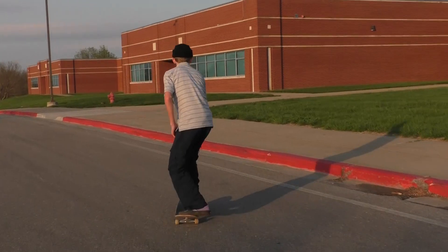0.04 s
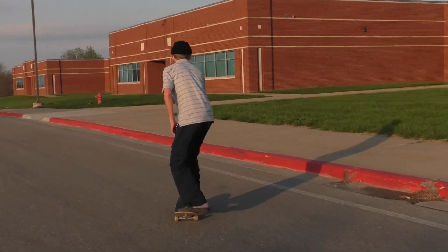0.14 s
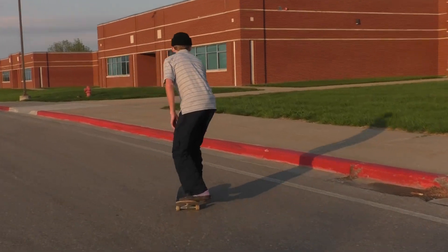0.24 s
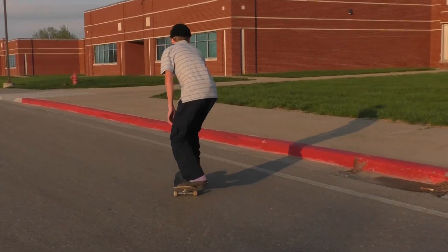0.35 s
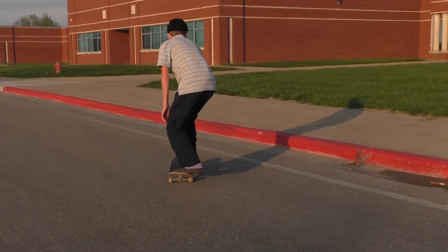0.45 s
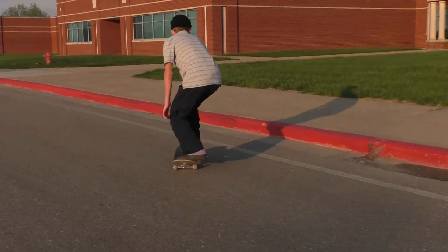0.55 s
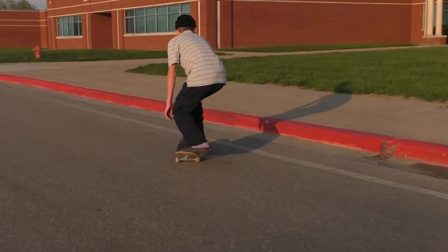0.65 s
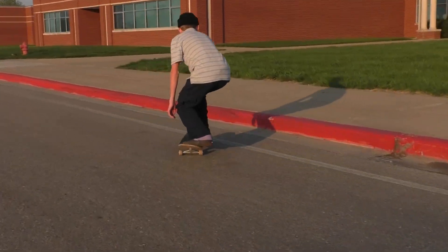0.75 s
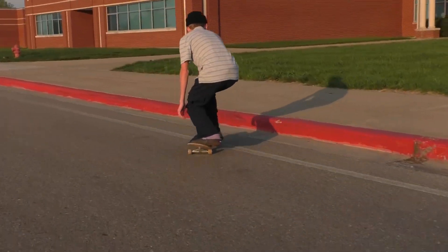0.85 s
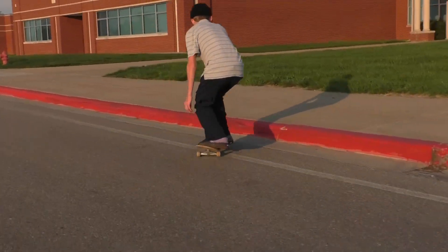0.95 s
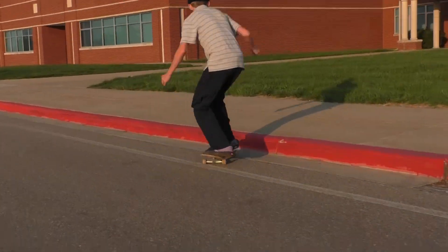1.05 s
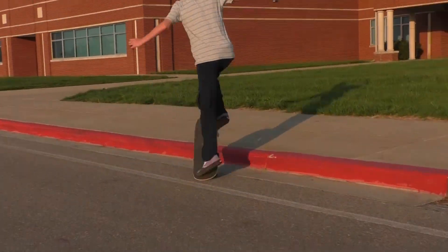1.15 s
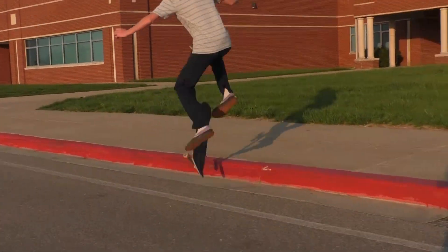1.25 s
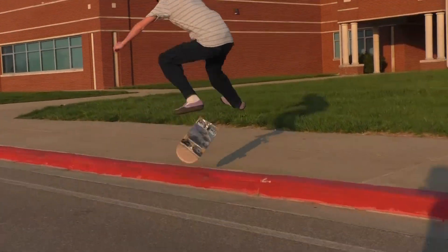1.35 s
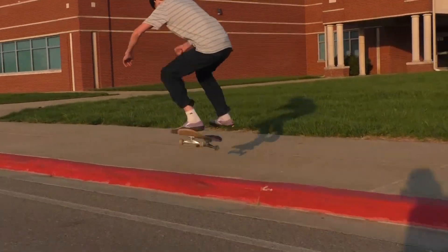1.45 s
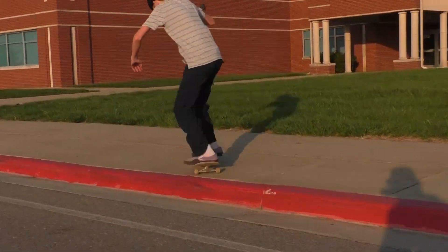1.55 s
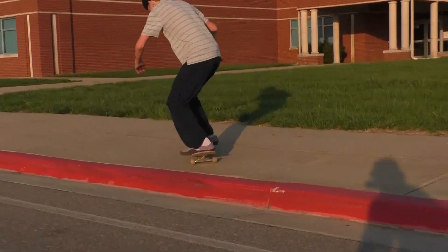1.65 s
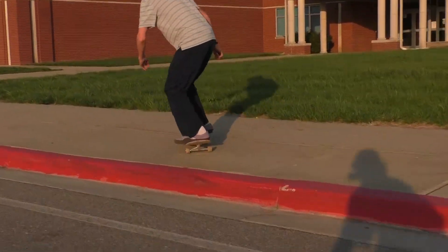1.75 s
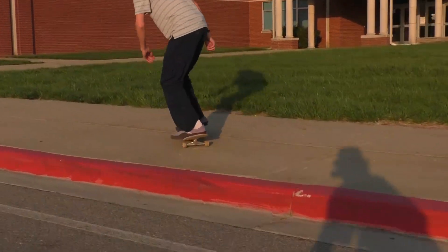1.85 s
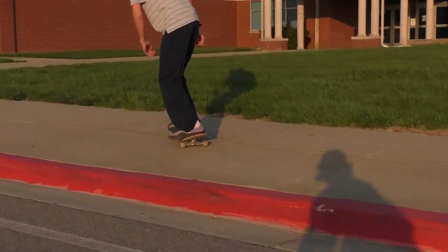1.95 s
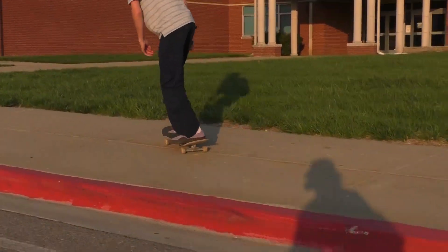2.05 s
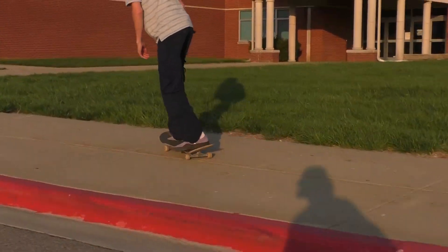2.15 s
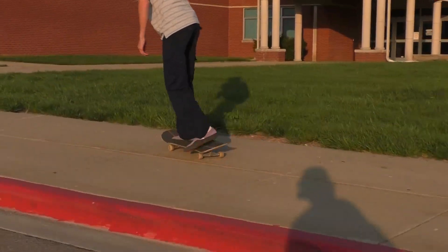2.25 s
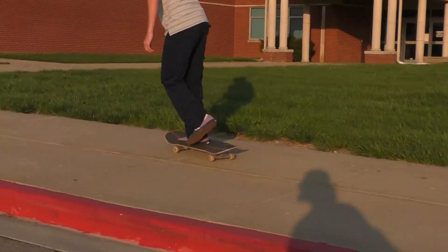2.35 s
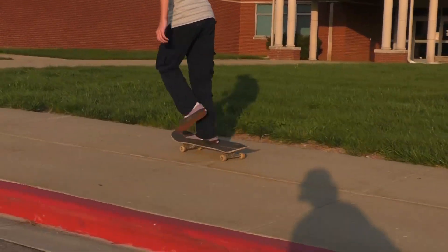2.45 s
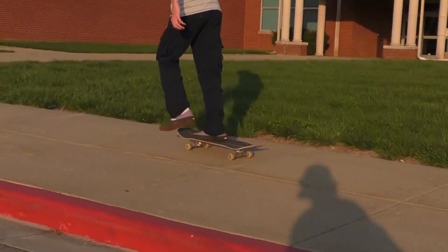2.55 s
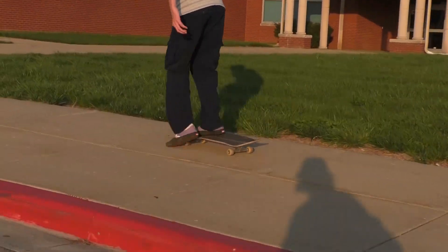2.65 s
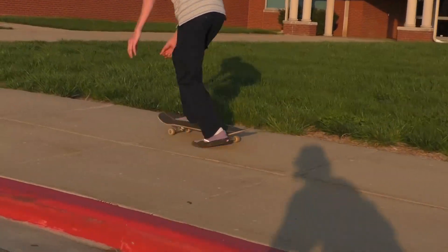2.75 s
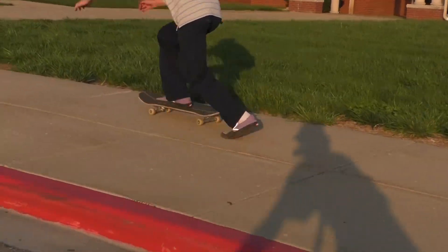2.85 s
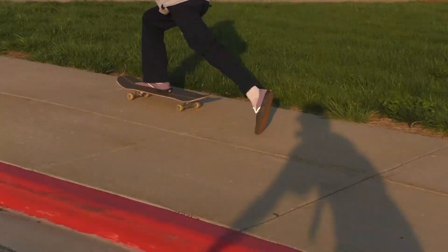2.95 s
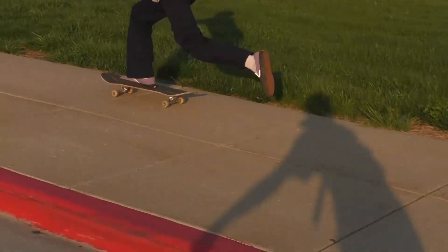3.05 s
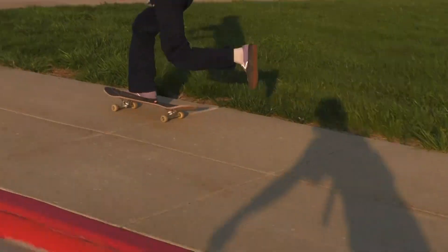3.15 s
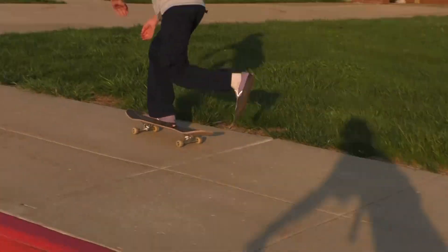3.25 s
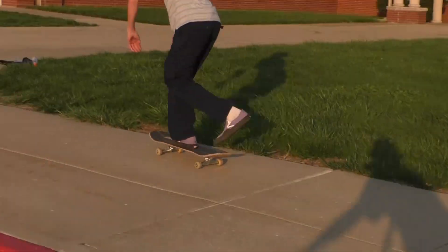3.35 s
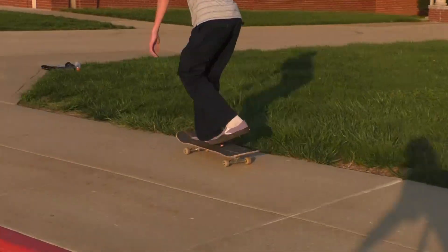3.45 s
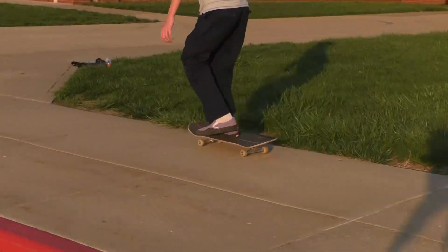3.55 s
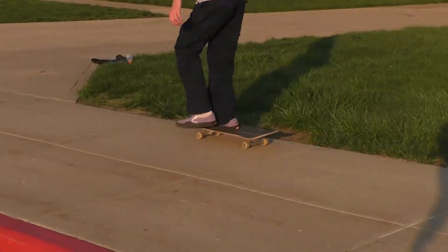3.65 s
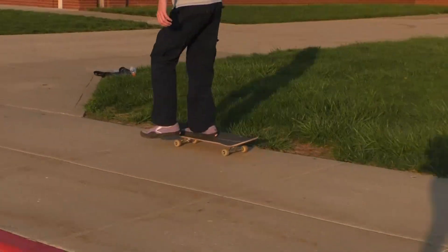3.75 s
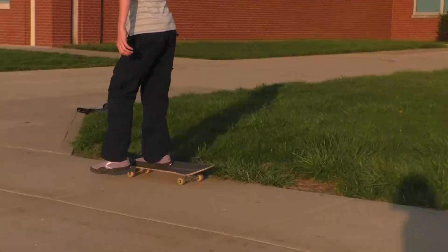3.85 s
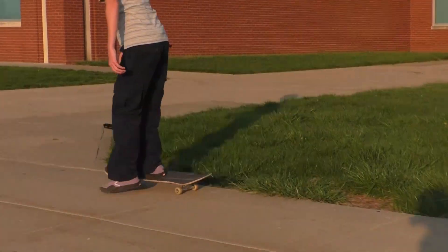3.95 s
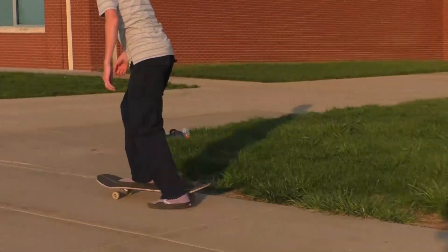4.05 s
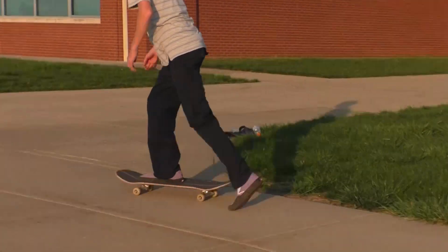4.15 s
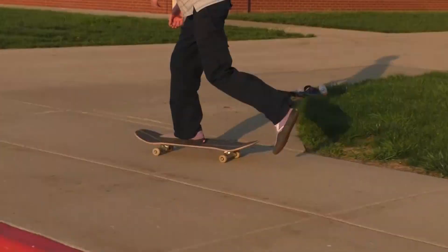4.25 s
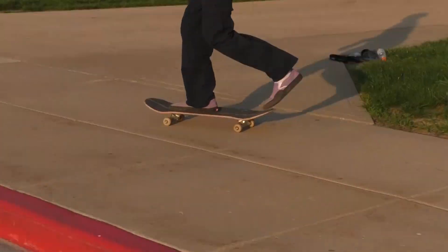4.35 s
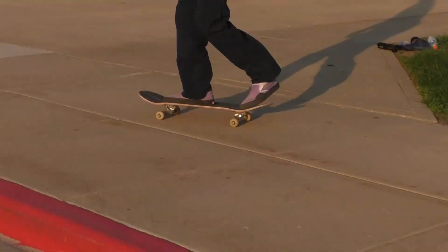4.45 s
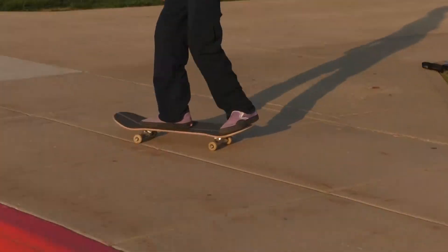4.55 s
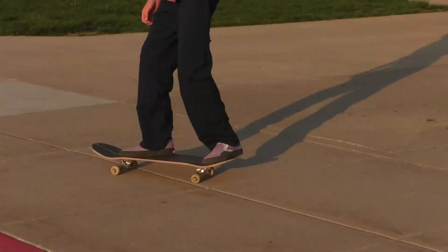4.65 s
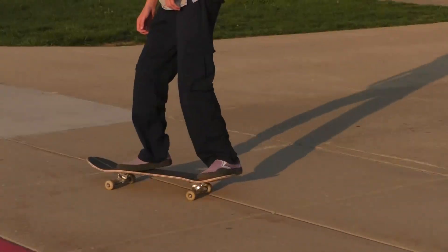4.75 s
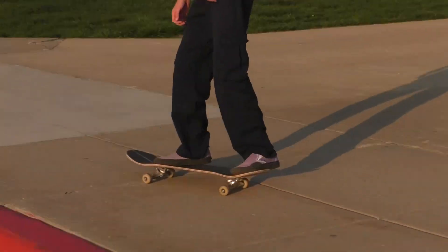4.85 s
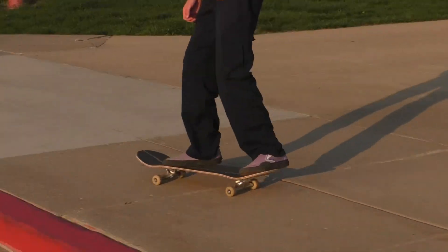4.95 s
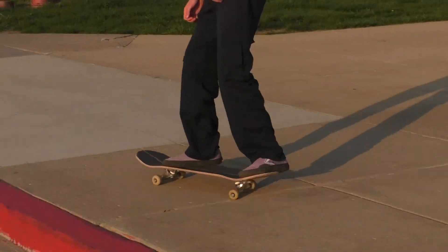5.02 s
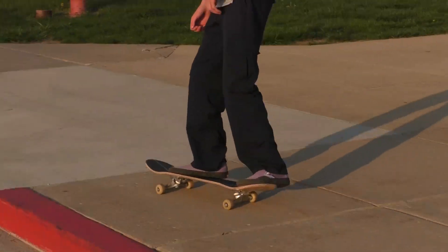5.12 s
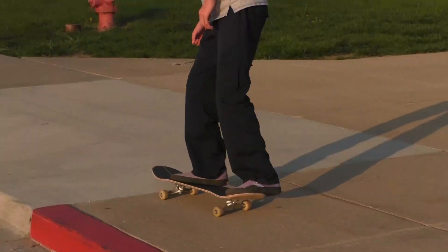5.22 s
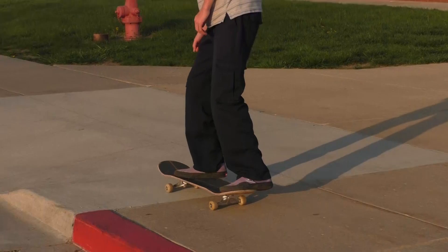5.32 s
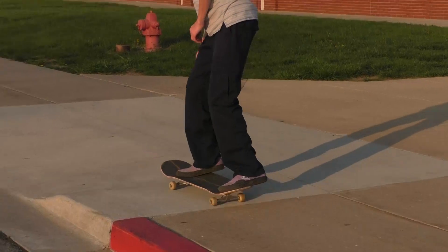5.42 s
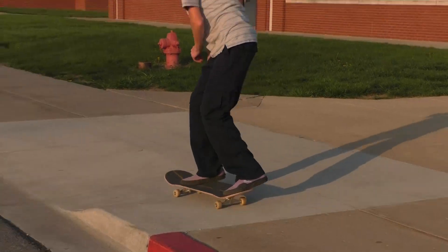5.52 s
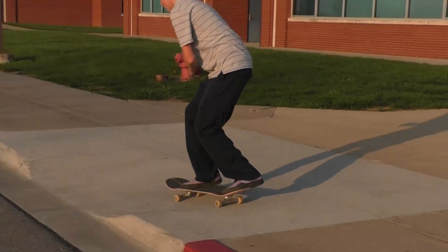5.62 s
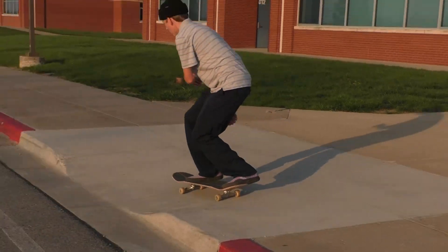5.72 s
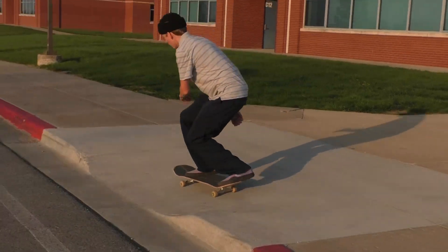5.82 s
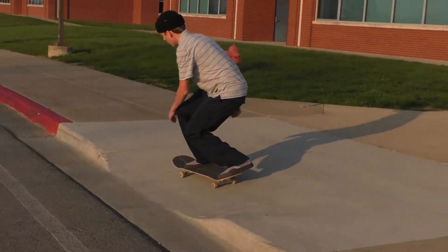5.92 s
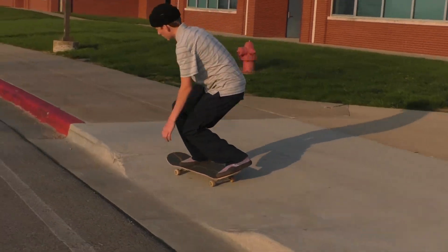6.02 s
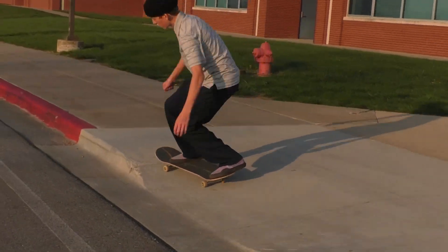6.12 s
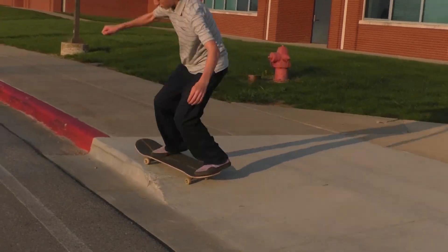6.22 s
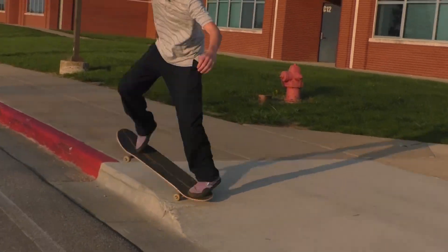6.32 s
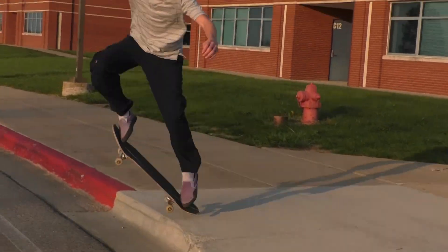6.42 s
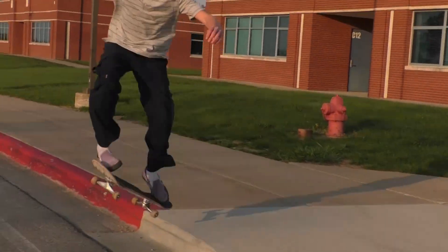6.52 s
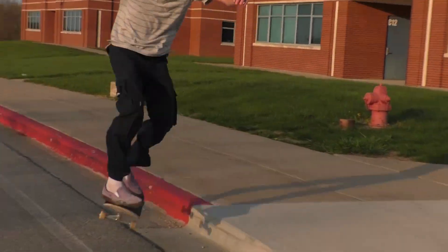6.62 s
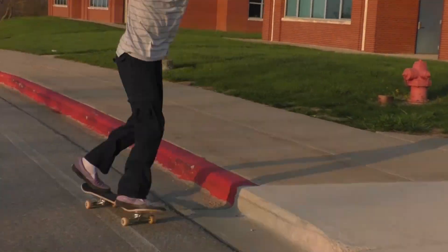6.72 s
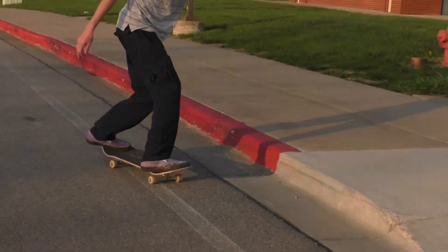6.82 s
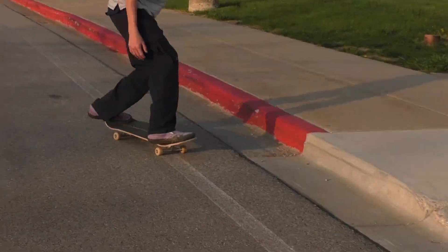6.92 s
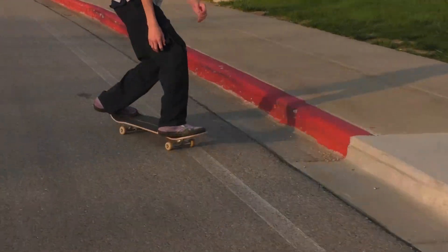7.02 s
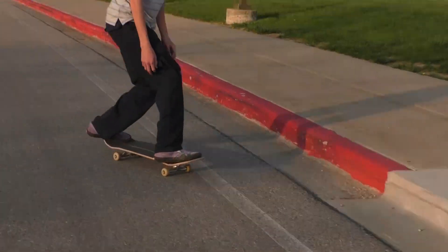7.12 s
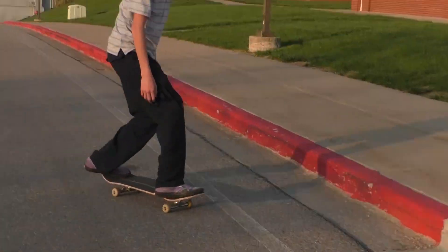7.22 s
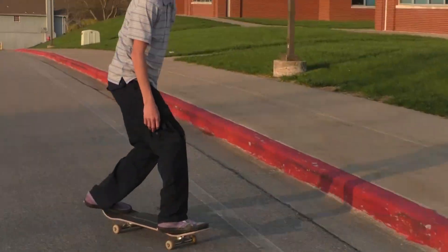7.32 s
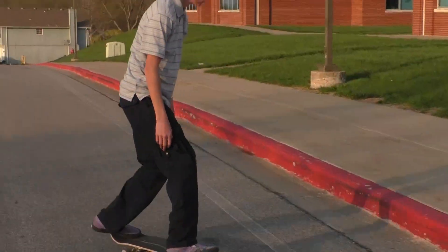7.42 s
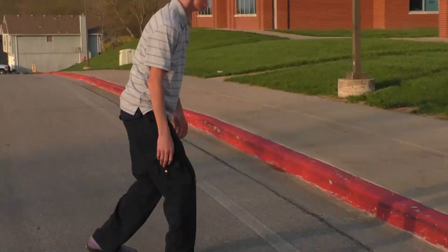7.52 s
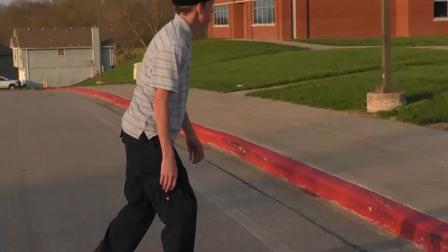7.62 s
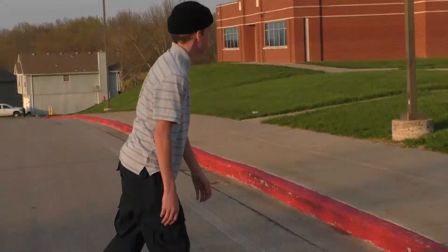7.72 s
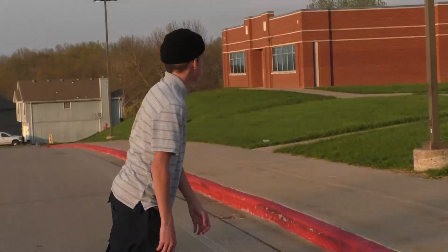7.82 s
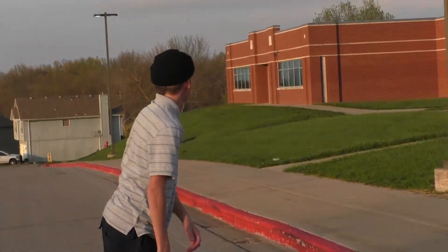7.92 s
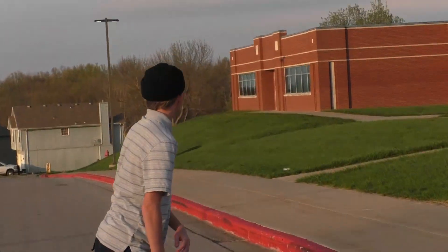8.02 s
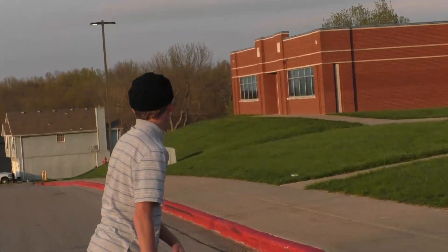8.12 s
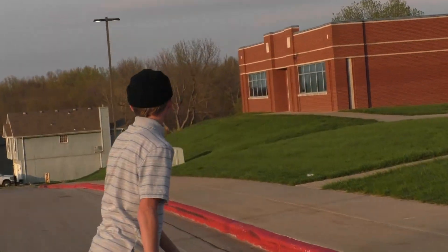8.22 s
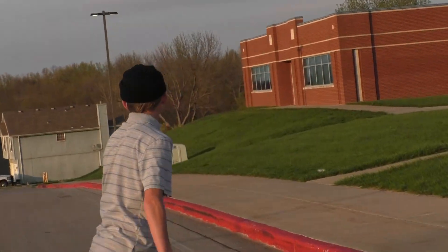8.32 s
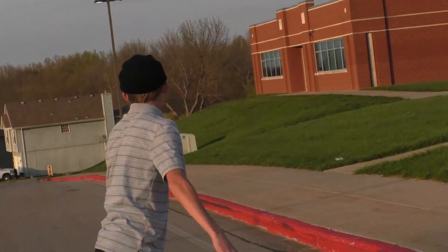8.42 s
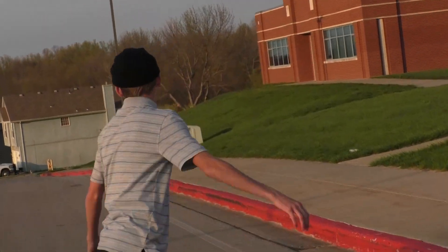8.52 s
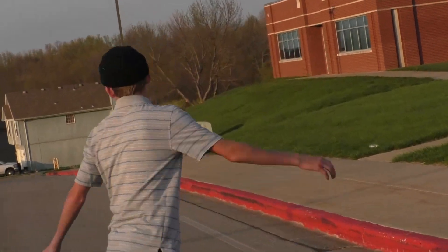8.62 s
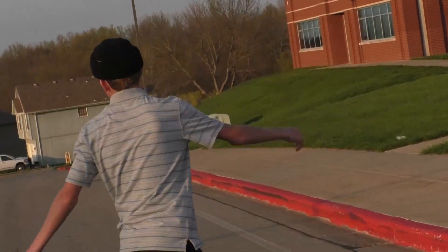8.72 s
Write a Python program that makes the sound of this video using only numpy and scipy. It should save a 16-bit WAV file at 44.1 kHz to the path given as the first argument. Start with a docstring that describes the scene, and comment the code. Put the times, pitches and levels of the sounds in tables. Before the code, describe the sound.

A steady woody drumming of wheels on coarse asphalt, with crackling grit, loose hardware rattle and faint bearing hiss, heard from a camera riding just above the board. Sharp clacks mark a jump onto the kerb, slab joints and a drop back to the road. Low air buffeting and a faint drone sit beneath, with a very short, dry outdoor reflection.

```python
"""Skateboards roll over asphalt and concrete paving, one of them right under a moving camera.
The road's grain drums through the wheels into the deck; grit crackles, hardware rattles, bearings hiss,
and a drone and moving air lie underneath. Jolts, snapping pebbles and wheel clacks over joints break in,
a board pops up a kerb, soles and wheels scrape sideways, and a board later lands back on the road.
The camera's limiter ducks the rolling after the hardest blows."""
import sys
import numpy as np
from scipy import signal
from scipy.fft import rfft, irfft, next_fast_len
from scipy.io import wavfile
from scipy.ndimage import uniform_filter1d, map_coordinates

SR = 44100
rng = np.random.default_rng(int(sys.argv[2]) if len(sys.argv) > 2 else 0)


def master_out(mix):
    """Clip the mix to full scale and print it as 16-bit PCM to the path in sys.argv[1]."""
    frames = np.transpose(np.atleast_2d(mix))
    ceiling = np.clip(frames, -1, 1)
    pcm = np.round(ceiling * 32767).astype(np.int16)
    wavfile.write(sys.argv[1], SR, pcm)


N = 386757

# the ride as the ground changes; the sources trim these levels further:
# [time_s, deck_rumble_db, wheel_growl_db, bearing_hiss_db]
GROUND_RIDE = [(0.0, -22.5, -35, -57.5), (1.15, -21, -33.5, -55.5), (1.4, -22, -35.5, -61),
               (1.75, -20, -33, -57), (2.1, -20, -30.5, -52.5), (2.65, -22.5, -33, -55.5),
               (3.05, -22, -33, -51), (3.22, -26.5, -34.5, -51.5), (3.4, -22.5, -32.5, -55),
               (3.6, -26.5, -36.5, -57.5), (3.75, -23, -35, -54), (3.92, -21, -31, -57.5),
               (4.25, -25, -37, -57), (4.75, -21, -31.5, -56), (5.3, -23.5, -32.5, -54.5),
               (5.75, -21.5, -36, -54), (6.3, -20, -33, -51), (6.65, -21.5, -32.5, -59.5),
               (7.1, -20, -34.5, -55), (7.85, -25, -36, -53.5), (8.2, -25, -37.5, -59),
               (8.77, -24, -28.5, -58)]
# the ringing of wood and truck: [pitch_hz, relative_level_db, t60_s]
BOARD_MODES = [(990, 7, 0.033), (1233, 5, 0.027), (1573, 4, 0.027), (1813, 3, 0.018), (2110, 0.5, 0.027),
               (2424, -6.5, 0.035), (2905, -0.5, 0.023), (3266, -5, 0.033), (3660, -6, 0.041),
               (4080, -8, 0.053), (4840, -6.5, 0.033)]
# colour of a dry crack: [pitch_hz, relative_level_db]
CRACK_COLOUR = [(400, -8), (1200, 12.5), (2000, 5.5), (3900, -0.5), (5800, -7), (12000, -61)]
# colour of clicking metal: [pitch_hz, relative_level_db]
METAL_COLOUR = [(3000, -38), (5500, -5.5), (7000, 0.5), (8800, 10.5), (10800, 8.5), (13000, -2),
                (16000, -1)]


def amp(db):
    """Decibels to gain."""
    return np.exp(np.asarray(db) * np.log(10) / 20)


def unit(x):
    """Scale to rms 1."""
    return x / np.sqrt(np.mean(x ** 2) + 1e-20)


def along(points, hz):
    """Interpolate (Hz, value) points on a log frequency axis."""
    f, v = np.transpose(points)
    return np.interp(np.log(hz + 1), np.log(f + 1), v)


def curves(rows):
    """One value per sample for each column after the time."""
    s, *cols = np.transpose(rows)
    return [np.interp(np.arange(N) / SR, s, c) for c in cols]


def during(span, fade_s):
    """1 inside the span and 0 outside, with soft edges."""
    t = np.arange(N) / SR
    return np.clip(np.minimum(t - span[0], span[1] - t) / fade_s + .5, 0, 1)


def wobble(rate):
    """A smooth random curve, rate knots a second."""
    knots = rng.standard_normal(int(N * rate / SR) + 4)
    return map_coordinates(knots, [np.arange(N) * rate / SR])


def filtered(x, response):
    """Filter x by a response given as a function of frequency."""
    m = next_fast_len(N + 8192)
    return irfft(rfft(x, m) * response(np.fft.rfftfreq(m, 1 / SR)), m)[..., :N]


def body(x, spectrum):
    """Ring x through a causal, minimum-phase body with this spectrum; the result has rms 1."""
    size = 4096
    cepstrum = irfft(np.log(amp(along(spectrum, np.fft.rfftfreq(size, 1 / SR)))))
    # folding the cepstrum forward in time makes the body respond only after the blow
    cepstrum[1:size // 2] *= 2
    cepstrum[size // 2 + 1:] = 0
    impulse = irfft(np.exp(rfft(cepstrum)))
    return unit(signal.oaconvolve(x, impulse)[:N])


def stones(rate, spread_db):
    """Tiny impacts of either sign at random times, rate a second, with capped log-normal sizes; rms 1."""
    chance, size = rng.random(N), np.minimum(rng.standard_normal(N), 2)
    at = np.flatnonzero(chance < rate / SR)
    signs = np.sign(chance[at] - rate / SR / 2)
    impacts = np.zeros(N)
    impacts[at] = signs * amp(spread_db * size[at])
    return unit(impacts)


def noise(spectrum):
    """Smooth noise with this spectrum; rms 1."""
    return body(rng.standard_normal(N), spectrum)


def narrow(hz, width_hz):
    """One resonance shaken at random, at half amplitude width_hz off its centre; rms 1."""
    return unit(filtered(rng.standard_normal(N), lambda f: 1 / (1 + ((f - hz) / width_hz) ** 2)))


def spread(direct, spectrum, side_db):
    """Direct sound in the middle plus scattered sound of opposite sign left and right."""
    side = amp(side_db) * noise(spectrum)
    return np.array([direct + side, direct - side])


def add(track, s, sound):
    """Mix a sound into the track at time s."""
    part = track[round(s * SR):][:len(sound)]
    part += sound[:len(part)]


def deck():
    """The road's grain shakes the deck; its ring shifts during the push, and resonances sing on some ground."""
    # the loaded deck: [pitch_hz, relative_level_db]
    loaded_colour = [(140, -36), (230, -16), (264, -11), (335, -0.5), (448, 1), (492, 0.5), (625, 2),
                     (692, -1.5), (777, -2), (873, -15), (980, -11), (1300, -31.5), (1690, -48),
                     (2860, -120)]
    # the deck under one foot: [pitch_hz, relative_level_db]
    light_colour = [(140, -26), (215, -9), (260, 0), (300, -2), (355, -5), (440, 3.5), (520, 4.5), (630, 5),
                    (770, 2), (860, -23), (960, -16), (1300, -16), (1690, -26), (2860, -120)]
    # the loaded deck's clearest resonances: [pitch_hz, width_hz, lift_db]
    clear_modes = [(442, 19, 2), (823, 31, 1.5), (936, 79, 1)]
    # how strongly three resonances sing, relative to the rumble: [time_s, low_db, main_db, high_db]
    sing_levels = [(0, -30, -26, -14), (1.2, -15, -20, -12), (2.2, -9.5, -4.5, -39), (3.5, -11, -10.5, -34),
                   (4.9, -6, -10, -12), (5.9, -14, -11, -15.5), (7.1, -11.5, -22, -13.5),
                   (7.5, -8, -3, -22), (8.77, -15, -1, -17)]
    # those three resonances: [pitch_hz, half_width_hz]
    sing_modes = [(318, 39), (630, 52), (940, 77)]
    # the rumble wavers with the unevenness of the paving
    uneven_db, uneven_per_s = 0.42, 30
    # the rumble dips while the wheels skip from jolt to jolt
    judder_s, judder_dip_db = (3.76, 4.15), -2.5
    # the rider takes one foot off to push
    push_s, push_fade_s = (3.2, 4.36), 0.18

    def resonant(f):
        response = 1
        for hz, width, db in clear_modes:
            damping = 1j * f * width
            response = response + (amp(db) - 1) * damping / (hz * hz - f * f + damping)
        return response

    roll_db = curves(GROUND_RIDE)[0] + uneven_db * wobble(uneven_per_s)
    roll_db = roll_db + judder_dip_db * during(judder_s, fade_s=0.037)
    pushing = during(push_s, push_fade_s)
    loaded = body(filtered(stones(rate=2500, spread_db=2), resonant), loaded_colour)
    light = body(stones(rate=1500, spread_db=2.5), light_colour)
    # equal-power crossfade between the two deck colours
    shake = np.sqrt(1 - pushing) * loaded + np.sqrt(pushing) * light
    singing = sum(amp(db) * narrow(hz, width) for db, (hz, width) in zip(curves(sing_levels), sing_modes))
    return amp(roll_db) * spread(unit(shake + singing), loaded_colour, side_db=-25.0)


def grit_level():
    """Grit in dB: it rises with both the growl of rough ground and the hiss of fast wheels."""
    _, growl_db, hiss_db = curves(GROUND_RIDE)
    return (growl_db + hiss_db) / 2 - 5.5


def wheels():
    """Wheels growl and crush grit as stones strike them; rough patches lift both, and the bearing hiss less."""
    # wheel growl: [pitch_hz, relative_level_db]
    growl_colour = [(500, -46.5), (780, 0.5), (940, 0), (1100, -3.5), (1400, -9), (1800, -21.5),
                    (2600, -22.5), (5000, -53)]
    # crushed grit: [pitch_hz, relative_level_db]
    grit_colour = [(900, -39), (1600, 6), (2150, 1.5), (2700, -3.5), (3500, -2), (4700, -5), (5800, -18),
                   (7500, -24), (12000, -48)]
    # bearing hiss: [pitch_hz, relative_level_db]
    hiss_colour = [(3500, -23), (5800, 1.5), (6800, -2), (7500, -1), (8400, 2.5), (9300, 1.5), (10700, 2),
                   (12000, -1.5), (13200, -3), (15800, -12)]
    _, growl_db, hiss_db = curves(GROUND_RIDE)
    patches_db = 1.7 * wobble(35)
    growl = spread(body(stones(rate=1800, spread_db=5.5), growl_colour), growl_colour, side_db=-14.5)
    grit = spread(body(stones(rate=1800, spread_db=1.5), grit_colour), grit_colour, side_db=-10.5)
    hiss = body(stones(rate=13000, spread_db=7.0), hiss_colour)
    return (growl * amp(growl_db - 3.0 + patches_db)
            + grit * amp(grit_level() + patches_db)
            + hiss * amp(hiss_db + patches_db / 2))


def rattle():
    """Loose hardware ticks against the board and rings it, louder on gritty ground and on concrete."""
    ticks_per_s, size_spread_db = 75, 3
    below_grit_db = -4
    # the stretch of slabs shakes it harder
    concrete_s, concrete_db = (3.3, 6.5), 0.5
    t = np.arange(SR // 20) / SR
    ticks = stones(rate=ticks_per_s, spread_db=size_spread_db)
    hz, db, t60 = np.transpose(BOARD_MODES)[:, :, None]
    modes = amp(db - 60 * t / t60) * np.sin(2 * np.pi * hz * t)
    click_fade = amp(-60 * t / 0.059)
    rings, clicks = np.zeros((2, N))
    metal = noise(METAL_COLOUR)
    # every tick shares its energy among the modes in a new way
    shares = rng.standard_normal(N + len(BOARD_MODES))
    for at in np.flatnonzero(ticks):
        add(rings, at / SR, ticks[at] * unit(shares[at:at + len(BOARD_MODES)]) @ modes)
        add(clicks, at / SR, abs(ticks[at]) * click_fade)
    level_db = grit_level() + below_grit_db + concrete_db * during(concrete_s, fade_s=.1)
    return amp(level_db) * (unit(rings) + amp(-5.5) * unit(clicks * metal))


def low_end():
    """The deck's slow bending drones; moving air buffets the microphone, mostly apart left and right."""
    # the drone: [pitch_hz, relative_level_db]
    drone_colour = [(60, -63), (105, -17), (140, -7), (165, -8), (203, 3.5), (250, -1.5), (330, -21.5),
                    (600, -68.5)]
    # the drone over time, before its trim: [time_s, level_db]
    drone_levels = [(0.0, -45), (2.4, -40), (3.05, -32.5), (3.4, -45), (3.7, -43), (3.95, -51),
                    (5.3, -34.5), (5.8, -39.5), (6.6, -37), (7.1, -37.5), (8.77, -36)]
    # moving air: [pitch_hz, relative_level_db]
    air_colour = [(15, -9), (30, -3), (65, 6.5), (100, 6.5), (160, 11), (400, -59.5)]
    # gusts on the microphone, before their trim: [time_s, level_db]
    gust_levels = [(0.0, -61), (1.55, -54.5), (2.1, -64), (3.0, -49), (3.7, -48.5), (4.05, -60), (4.4, -42),
                   (4.6, -53.5), (5.25, -49.5), (5.5, -72), (7.1, -74), (7.8, -63), (8.2, -77)]
    air_db, = curves(gust_levels)
    drone_db, = curves(drone_levels)
    drone = amp(drone_db + 1.3) * noise(drone_colour)
    flutter_db = 1.3 * wobble(7.3)
    return drone + amp(air_db + 5.5 + flutter_db) * spread(noise(air_colour), air_colour, side_db=1.5)


def bumps():
    """Uneven paving jolts the wheels: a hollow shudder of the deck that swells and fades."""
    # dull bumps of the wheels, before a common trim: [start_s, level_db]
    jolts = [(0.541, -20), (2.778, -13), (3.412, -17), (3.761, -12.5), (3.818, -12.5), (3.887, -11),
             (3.956, -13), (4.013, -12.5), (4.067, -14.5), (4.148, -15), (4.178, -17), (4.452, -15),
             (5.236, -13.5), (5.393, -12), (5.701, -11.5), (5.782, -20), (5.859, -14.5), (6.155, -16),
             (6.435, -16), (6.544, -20), (6.701, -12), (8.353, -14)]
    # the hollow shudder: [pitch_hz, relative_level_db]
    thud_colour = [(170, -39.5), (320, -17), (470, -4), (610, -2), (760, -8), (900, -20.5), (1500, -33.5),
                   (3500, -58)]
    rise_s, fade_s = 0.0039, .02
    out, t = np.zeros(N), np.arange(SR // 16) / SR
    swell = (1 - np.exp(-t / rise_s)) * np.exp(-(t / fade_s) ** 2)
    thud = noise(thud_colour)
    for s, db in jolts:
        shudder = unit(swell * thud[round(s * SR):][:len(t)])
        add(out, s, amp(db - 12) * shudder)
    return out


def pebbles():
    """A pebble pinched under a wheel gives one short, dry snap of decaying noise."""
    # snaps: [start_s, starting_level_db]
    pinches = [(0.748, -40), (1.978, -31), (2.581, -31), (5.144, -44), (6.137, -41), (6.95, -34),
               (7.246, -31), (7.276, -33), (7.532, -35), (7.627, -38), (7.903, -36), (8.12, -35),
               (8.35, -37), (8.369, -39)]
    t60_s = 0.036
    snaps, t = np.zeros(N), np.arange(SR // 20) / SR
    for s, db in pinches:
        add(snaps, s, amp(db - 60 * t / t60_s))
    return snaps * (noise(CRACK_COLOUR) + amp(-17) * noise(METAL_COLOUR))


def clacks():
    """Each clack is two quick contacts; each rings the board, with a dry crack and a click of the metal truck."""
    # hard contacts of wheels, tail and trucks, with two favoured ring pitches, the second's level relative
    # to the first; crack, click and second contact are relative levels too:
    # [start_s, strength_db, first_ring_hz, second_ring_hz, second_ring_db, crack_db, metal_click_db,
    #  second_contact_delay_s, second_contact_db]
    contacts = [(1.246, -8, 2130, 3220, -6, -3.5, -20.5, .0054, -10),
                (1.555, -15.5, 2150, 2900, -4, -2, -18.5, 0.0072, -5),
                (1.624, -7, 1070, 3320, -1, -8, -23.5, .003, 5.5),
                (1.63, 0, 1900, 3250, -8, -4, -26, 0.0025, -2),
                (1.639, -5, 1050, 3300, -8, -11, -21, 0.0068, -14),
                (1.639, -8, 1560, 1830, -7, -16, -27, 0.006, 0),
                (2.8524, -17, 2920, 2550, 0, -1.5, -17, 0.0019, -7),
                (2.958, -17, 1300, 2470, 0, -1.5, -12.5, 0.0033, -13),
                (3.1408, -3, 1360, 2150, 0.5, 2.5, -18.5, 0.0086, -6.5),
                (3.277, -4, 1560, 1980, -16, 2, -19, 0.021, -19),
                (3.542, -22.5, 1890, 2900, -15, 2.5, -9.5, 0.0082, 2.5),
                (3.6674, -23, 1690, 3570, 3, 2.5, -8, .013, -0.5),
                (3.92, -21, 1900, 3300, -3, 2, -10.5, 0.0094, -7),
                (4.592, -29.5, 1550, 4000, 3, 0, -12, 0.018, 1),
                (4.7068, -19.5, 2070, 3600, -11, 2, -14, 0.019, -3),
                (4.774, -26.5, 1500, 2100, 4, -3, -23, 0.013, -9),
                (4.969, -19.5, 1780, 2840, -6, -1, -16, 0.015, 5),
                (5.103, -17, 1730, 2800, -11, -2, -17, 0.019, -1),
                (5.193, -20, 1620, 3300, -12, -8, -25, 0.005, -9),
                (5.23, -27.5, 1470, 2900, 6, -4, -25, 0.0086, 3),
                (5.3772, -14.5, 2380, 4050, -9, 1, -13.5, 0.013, -9),
                (5.5143, -14.5, 1790, 3500, -10, 3.5, -15, 0.0062, 0),
                (5.716, -33, 1620, 4900, 3, 3, -1, 0.0028, -6),
                (6.268, -18, 2850, 2470, -8, -5, -14.5, 0.0035, -10),
                (6.3001, -26, 2850, 3300, -6, -6, -22, 0.015, -2),
                (6.3425, -35, 2400, 3600, -3, -7, -22, .002, -8),
                (6.377, -23, 2150, 3600, 2, 0, -7, 0.0067, -9),
                (6.47, -17.5, 1773, 2900, -6, 1.5, -12.5, 0.007, -5),
                (6.774, -6, 1240, 2020, -2, 2, -16, .0063, -22),
                (6.791, -3, 1300, 3300, -5, -3, -18, .0015, -7),
                (6.7926, -2, 1250, 2200, 2, -3, -29, 0.0064, -12),
                (6.815, -9.5, 1400, 1950, -1, 1, -13.5, 0.012, -8)]
    # hard blows ring more than they crack: the crack gains only crack_grows dB per dB of blow
    medium_blow_db, crack_trim_db, crack_grows = -19.5, -27, 0.73
    # modes near the favoured pitches are lifted above the bleed level that all modes get
    ring_trim_db, bleed_db, reach_octaves = -12.5, -20.5, 0.25
    ring, crack, click = np.zeros((3, N))
    t = np.arange(SR // 16) / SR
    hz, level_db, t60 = np.transpose(BOARD_MODES)[:, :, None]
    attack = 1 - np.exp(-t / 0.0013)
    near = lambda centre_hz: np.exp(-(np.log2(hz / centre_hz) / reach_octaves) ** 2)
    for start, first_db, first_ring_hz, second_ring_hz, second_ring_db, crack_db, metal_db, delay, second_db in (
            contacts):
        favour = near(first_ring_hz) + amp(second_ring_db) * near(second_ring_hz) + amp(bleed_db)
        for s, db in (start, first_db), (start + delay, first_db + second_db):
            size, detune = rng.standard_normal((2, len(BOARD_MODES), 1))
            strengths = unit(favour * amp(level_db + 1.7 * size)) * rng.choice([-1, 1], size.shape)
            tones = np.sin(2 * np.pi * hz * (1 + 0.021 * detune) * t)
            modes = strengths * amp(-60 * t / t60) * tones
            add(ring, s, amp(db + ring_trim_db) * attack * modes.sum(0))
            blow_db = crack_trim_db + crack_db + crack_grows * (db - medium_blow_db)
            add(crack, s, attack * amp(blow_db - 60 * t / 0.034))
            add(click, s, attack * amp(db + metal_db - 60 * t / 0.026))
    return ring + crack * noise(CRACK_COLOUR) + click * noise(METAL_COLOUR)


def treble_swells():
    """Bands of treble noise, narrow or broad, swell and fade, like bearing hiss and ringing trucks."""
    # bands: [start_s, end_s, level_db, centre_hz, half_width_hz]
    bands = [(1.4, 3.4, -64, 8200, 260), (5.709, 5.738, -43, 7020, 130), (6.77, 6.94, -52, 10200, 1200),
             (6.7, 7.97, -62, 8300, 340), (7.6, 9.2, -55, 10800, 1300)]
    out = np.zeros(N)
    for start, end, db, hz, width_hz in bands:
        swell = np.sin(np.linspace(0, np.pi, max(int((end - start) * SR), 2)))
        add(out, start, amp(db) * swell * narrow(hz, width_hz)[:len(swell)])
    return out


def scuffs():
    """Soles and wheels scrape sideways: each scrape is a swell of coarse slips in a broad resonance."""
    # scrapes: [start_s, end_s, level_db, centre_hz]
    scrapes = [(3.827, 4.04, -36.5, 1250), (3.872, 4.05, -47, 3000), (6.229, 6.356, -42.5, 2700),
               (7.76, 7.87, -42.5, 2380), (8.101, 8.144, -37, 1361), (8.407, 8.44, -40, 1574),
               (8.583, 8.647, -42, 1350), (8.46, 8.68, -55, 4500)]
    slips_per_s, size_spread_db = 600, 3
    out = np.zeros(N)
    for start, end, db, hz in scrapes:
        resonance = [(hz / 3, -28), (hz, 0), (2 * hz, -16), (4 * hz, -38)]
        slips = body(stones(rate=slips_per_s, spread_db=size_spread_db), resonance)
        swell = np.sin(np.linspace(0, np.pi, max(int((end - start) * SR), 2)))
        add(out, start, amp(db) * swell * unit(slips[:len(swell)]))
    return out


def street(x):
    """Ground, kerb and walls scatter a weak, short answer."""
    t = np.arange(SR // 3) / SR
    tail = rng.standard_normal((2, len(t))) * amp(-60 * t / 0.075)
    tail = tail / np.linalg.norm(tail[0])
    return x + amp(-18.5) * signal.fftconvolve(x[None], tail, axes=1)[:, :N]


def released(cut_db, db_per_s):
    """Follow each peak of the cut at once and let it go at a steady rate."""
    fall_db = db_per_s * np.arange(N) / SR
    return np.maximum.accumulate(cut_db + fall_db) - fall_db


def limiter(x):
    """Loud blows push the gain down, so the rolling ducks after them and creeps back."""
    threshold_db, averaging_s = -11.5, 0.0029
    emphasis_hz = 913  # where the extra sensitivity to treble starts
    # quick release at first, then a slow creep of a share of the cut
    release_db_per_s, creep_db_per_s, creep_share = 43, 4.5, 0.7
    sensed = filtered(x, lambda hz: np.hypot(1, np.minimum(hz, 3000) / emphasis_hz))
    power = np.abs(uniform_filter1d(np.mean(sensed ** 2, axis=0), int(averaging_s * SR)))
    over_db = np.maximum(10 * np.log10(power + 1e-12) - threshold_db, 0)
    quick_db = released(over_db, release_db_per_s)
    creep_db = released(creep_share * over_db, creep_db_per_s)
    return x * amp(-np.maximum(quick_db, creep_db))


def scene():
    """All sources, the boards leaning slightly to the left; small boards radiate almost no deep bass."""
    # stereo lean: [pitch_hz, left_minus_right_db]
    balance = [(200, .3), (700, 1.3), (1290, 2.6), (2380, 2.6), (4400, 1), (8120, .4)]
    low_cut_hz = 85
    impacts = street(clacks() + rattle() + pebbles() + scuffs())
    boards = deck() + bumps() + wheels() + treble_swells() + impacts
    lean = lambda hz: amp(np.outer([.5, -.5], along(balance, hz)))
    low_cut = lambda hz: 1 - np.exp(-(hz / low_cut_hz) ** 2)
    return filtered(boards, lambda hz: lean(hz) * low_cut(hz)) + low_end()


def record(dry):
    """The camera limits the level and keeps nothing above its band limit."""
    top_hz = 15900
    return filtered(limiter(dry), lambda hz: hz < top_hz)


dry = scene()
out = record(dry)
master_out(out)
```